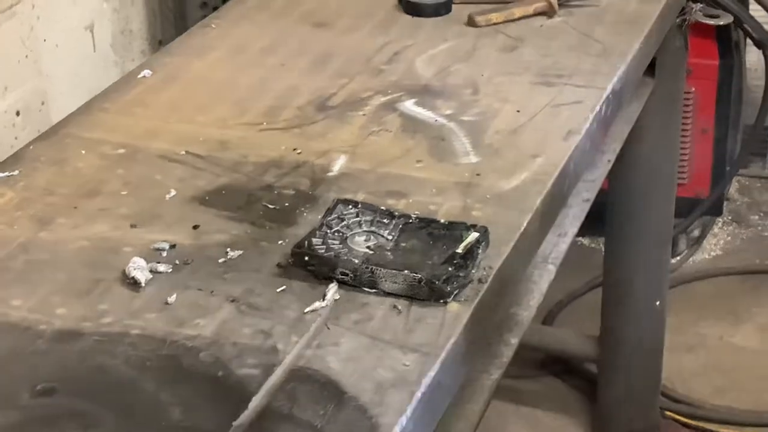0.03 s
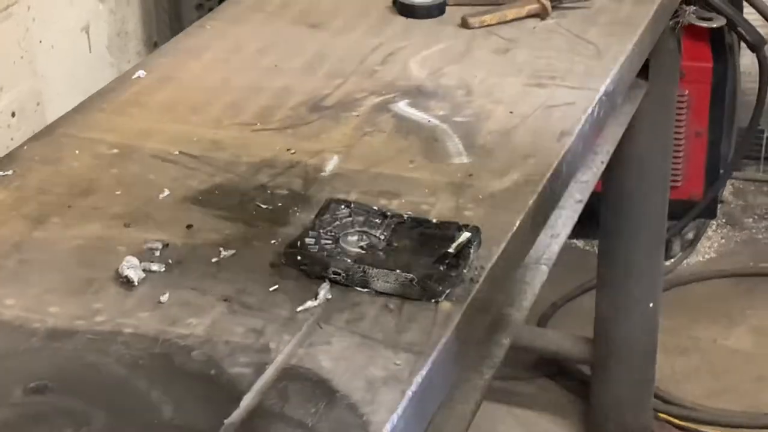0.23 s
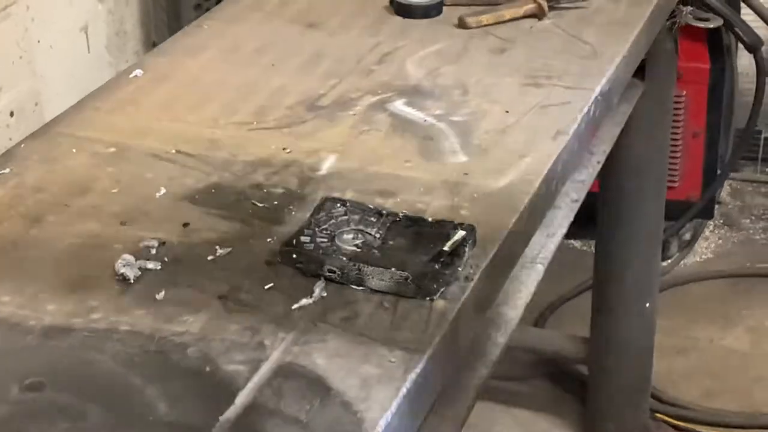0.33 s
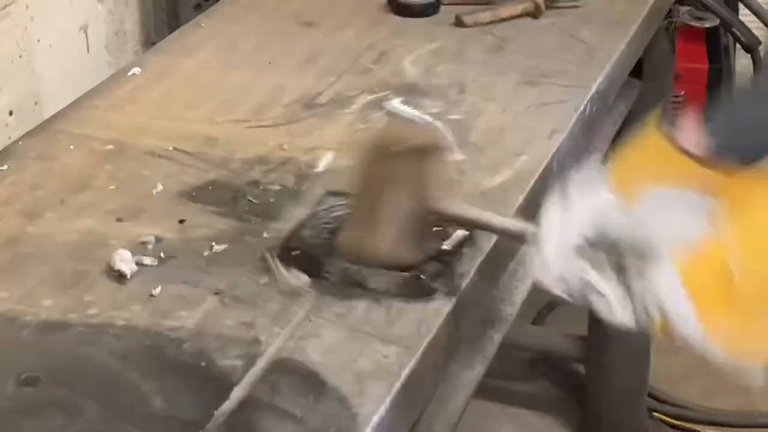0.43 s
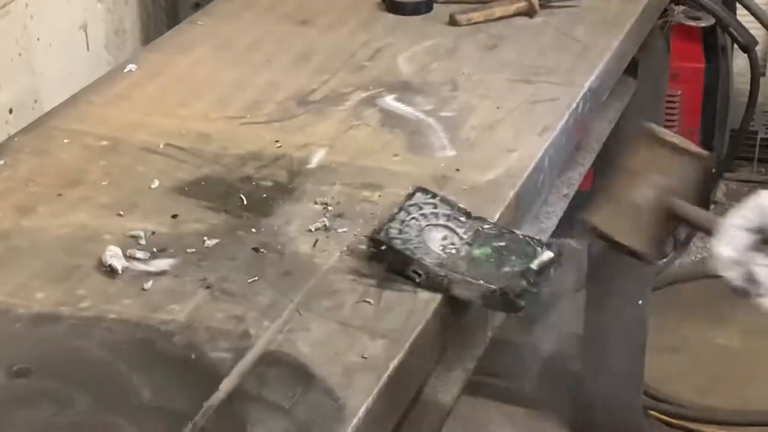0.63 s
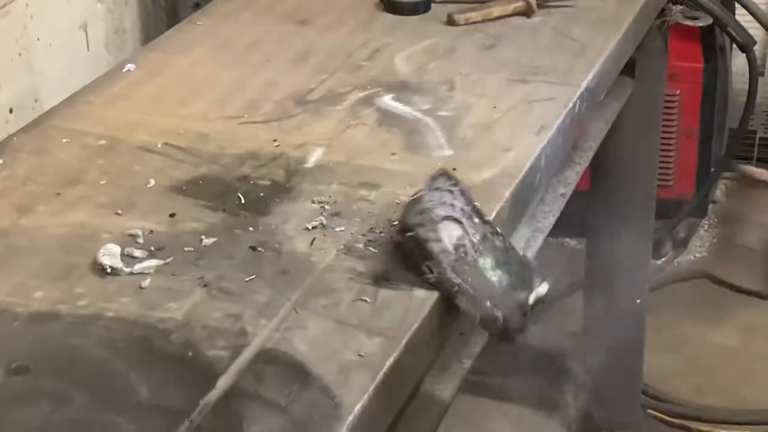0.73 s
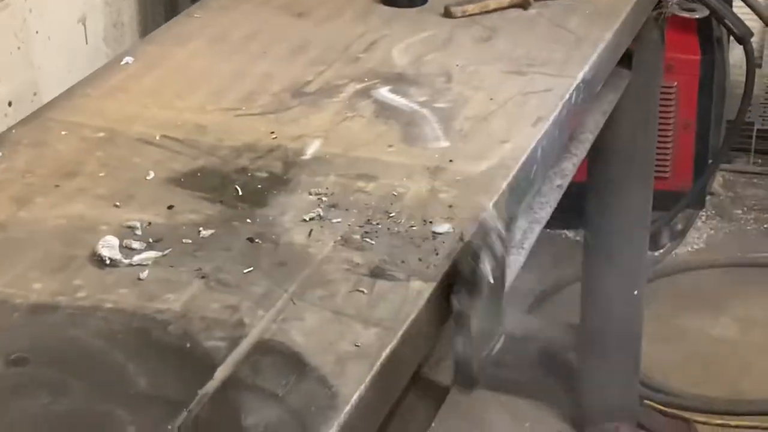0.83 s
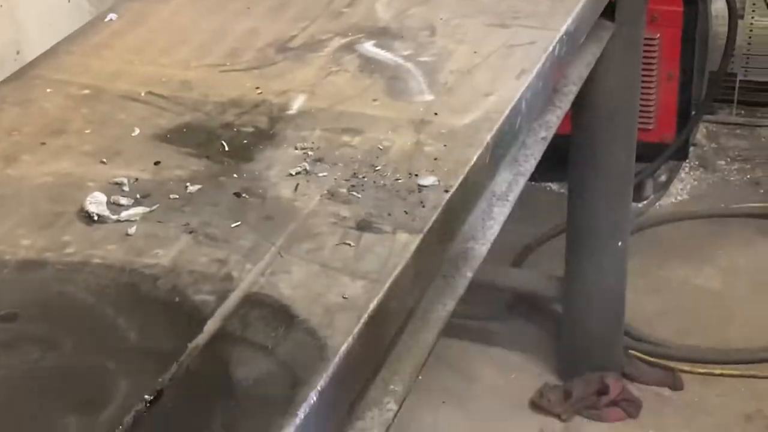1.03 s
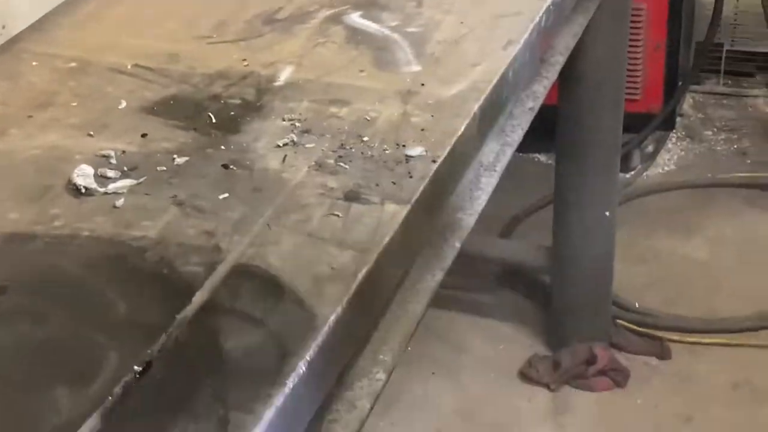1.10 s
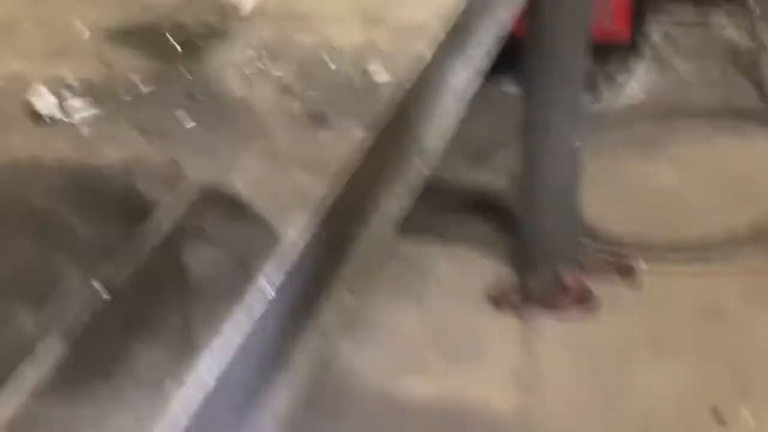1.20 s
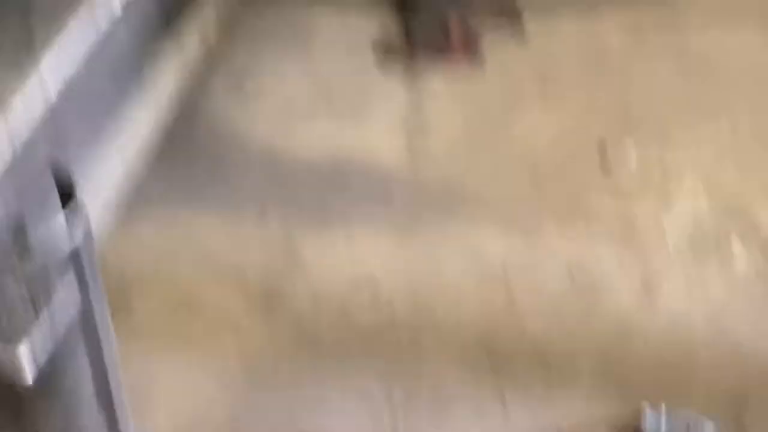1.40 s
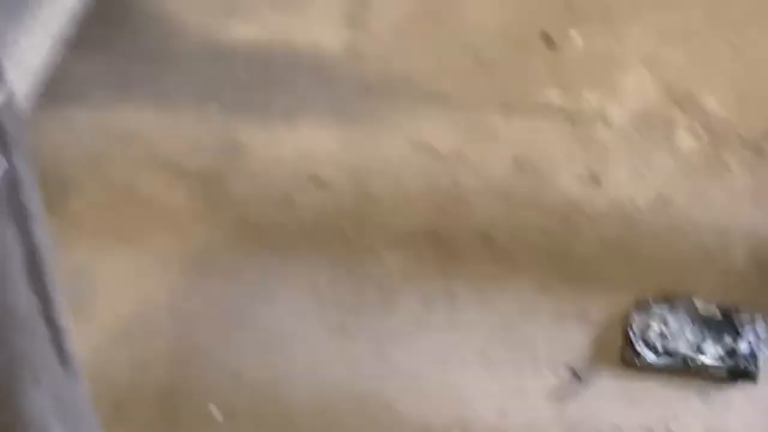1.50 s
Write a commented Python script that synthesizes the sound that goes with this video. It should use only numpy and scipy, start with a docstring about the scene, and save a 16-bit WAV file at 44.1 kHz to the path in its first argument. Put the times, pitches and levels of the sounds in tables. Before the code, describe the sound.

A hammer smashes a hard drive close by at about 0.5 seconds: a sharp crack, a booming, ringing steel workbench and rattling loose parts. The drive scrapes faintly off the edge around 0.75 seconds, knocks on the concrete floor farther away at 0.95, and clacks down again at 1.2, with small taps until 1.4. The workshop echoes, and a machine's quiet rush, low rumble and throbbing hum continue throughout.

```python
"""A hammer smashes a hard drive on a steel workbench: a short rasp swells, the case cracks,
the bench booms and rings, and loose parts rattle. The drive slides off, knocks on the
concrete floor, bounces and clacks down again. The workshop echoes each blow;
behind it all are a machine's rush, a low rumble and a throbbing hum."""
import sys
import numpy as np
from scipy import signal
from scipy.fft import rfft, irfft, next_fast_len
from scipy.io import wavfile
from scipy.ndimage import uniform_filter1d

SR = 44100
rng = np.random.default_rng(int(sys.argv[2]) if len(sys.argv) > 2 else 0)


def unload_wav(signal):
    """Save mono or channel-first audio to the path in sys.argv[1] as 16-bit WAV at rate SR, clipped to [-1, 1]."""
    wavfile.write(
        sys.argv[1],
        SR,
        np.round(np.clip(np.atleast_2d(signal).T, -1, 1) * 32767).astype(np.int16),
    )


N = 68355
T = np.arange(N) / SR


def amp(db):
    """Turn decibels into a gain."""
    return 10 ** (np.asarray(db) / 20)


def unit(x):
    """Scale to an average (rms) level of 1."""
    return x / np.sqrt(np.mean(x ** 2) + 1e-20)


def along(points, hz):
    """Read between a table's rows on a log frequency scale."""
    f, v = np.transpose(points)
    return np.interp(np.log(hz + 1), np.log(f + 1), v)


def filtered(x, response):
    """Turn each frequency up or down by its own gain."""
    m = next_fast_len(N + SR // 2)
    return irfft(rfft(x, m) * response(np.fft.rfftfreq(m, 1 / SR)), m)[..., :N]


def pan(db):
    """Two gains that make the left side db louder than the right."""
    return amp(np.array([[.5], [-.5]]) * db)


def fade(t, t60):
    """Die away by 60 dB in t60 seconds, the fade time."""
    return np.exp(-np.log(1000) * np.maximum(t, 0) / t60)


def strike(s, t60, attack_s=0.00065):
    """Rise quickly at time s, then fade."""
    t = np.maximum(T - s, 0)
    return (1 - np.exp(-t / attack_s)) * fade(t, t60)


def dying(x, s, decay):
    """From time s on, each frequency fades at its own speed."""
    hz, t, spectrum = signal.stft(x, SR, nperseg=256)
    return signal.istft(spectrum * fade(t - s, along(decay, hz)[:, None]), SR)[1][:, :N]


def grainy(depth_db):
    """A spiky gain that changes every millisecond or two."""
    jitter = unit(uniform_filter1d(rng.standard_normal(N), size=70))
    return unit(amp(depth_db * jitter))


# how far each frequency leans left: f/Hz, pan/dB
LEAN = [(60, -2), (280, 0.5), (600, 2), (1100, 2.5), (2200, 0.5), (5000, -1), (12000, 0.1)]
def noise(colour, alike):
    """Stereo noise: colour sets its tone, alike how well the sides match (1 = fully)."""
    def shape(hz):
        width = np.arccos(np.clip(along(alike, hz), -1, 1)) / 2
        return amp(along(colour, hz)) * [np.cos(width), np.sin(width)]
    mid, side = filtered(rng.standard_normal((2, N)), shape)
    stereo = np.array([mid + side, mid - side])
    return unit(filtered(stereo, lambda hz: pan(along(LEAN, hz))))


# how well left and right match in a hit: f/Hz, likeness
HIT_ALIKE = [(100, 1), (300, 0.98), (600, 0.65), (1200, 0.15), (4000, -0.13), (8000, -0.018),
             (13000, -0.076)]
def note(s, hz, t60, attack_s):
    """One note of struck metal; high notes are out of step between left and right."""
    spread = np.arccos(np.clip(along(HIT_ALIKE, hz), -1, 1)) * rng.choice([-1, 1])
    phase = 2 * np.pi * hz * (T - s) + np.array([[.5], [-.5]]) * spread
    return np.sin(phase) * strike(s, t60, attack_s)


# the background, which sinks after the blow: t/s, rush level/dB, rumble level/dB
BACKGROUND = [(0, -30, -40.5), (0.299, -30.5, -33), (.44, -30.5, -46.5), (.52, -46, -40),
              (.68, -40.5, -42.5), (.82, -37, -37.5), (0.921, -37, -42.5), (1.15, -39.5, -42.5),
              (1.55, -38.5, -43.5)]
# tone of the rush and of the rumble: f/Hz, level/dB
RUSH_COLOUR = [(60, -21), (120, -3.5), (230, -6), (330, -10), (520, -10.5), (800, -16), (1400, -22.5),
               (1900, -24), (3500, -28), (6500, -40.5), (12000, -41), (13500, -50.5), (15500, -46)]
RUMBLE_COLOUR = [(20, -20), (40, -10), (55, 6), (66, 9), (78, 10), (95, -20), (116, 8.5), (135, -41),
                 (250, -74.5)]
# how well left and right match in the rush: f/Hz, likeness
RUSH_ALIKE = [(150, 0.97), (400, 0.68), (1000, -0.15), (3000, -0.18), (9000, 0.6)]
def rush_and_rumble(swell_s=0.256, swell_width_s=0.022, swell_hz=67.4, swell_db=-27):
    """A machine rushes over a rumble; a low note swells once before the blow."""
    s, rush_db, rumble_db = np.transpose(BACKGROUND)
    rush = amp(np.interp(T, s, rush_db)) * noise(RUSH_COLOUR, RUSH_ALIKE)
    rumble = amp(np.interp(T, s, rumble_db)) * noise(RUMBLE_COLOUR, [(60, 0.95)])
    swell = amp(swell_db) * np.exp(-((T - swell_s) / swell_width_s) ** 2)
    return rush + rumble + swell * np.sin(2 * np.pi * swell_hz * T)


# loudness of the hum: t/s, level/dB
HUM_LEVEL = [(0, -33), (.4, -39), (.68, -41.5), (.73, -32), (.9, -29), (1.3, -31.5), (1.55, -32)]
def hum(hz=160.7, beat_hz=11.04, silent_at_s=1.14):
    """Two close tones drift in and out of step, so the hum throbs."""
    tone = np.sin(2 * np.pi * hz * T + rng.uniform(0, 2 * np.pi))
    throb = np.sqrt(2) * np.sin(np.pi * beat_hz * (T - silent_at_s))
    return amp(np.interp(T, *np.transpose(HUM_LEVEL))) * tone * throb


# how long the workshop echoes: f/Hz, fade time/s
ECHO_FADE = [(150, 0.49), (1000, 0.72), (3000, 0.55), (7000, 0.47), (14000, 0.27)]
# how well left and right match in the echo: f/Hz, likeness
ECHO_ALIKE = [(150, 1), (500, 0.48), (1200, 0.39), (4000, 0.16)]
def room(x, echo_db):
    """Add the workshop's echo, nearly the same on both sides in the bass."""
    hiss = noise([(50, -3), (300, -4)], ECHO_ALIKE)
    tail = dying(hiss, 0, ECHO_FADE) * (1 - np.exp(-T / 0.0023))
    tail /= np.linalg.norm(tail[0])
    return x + amp(echo_db) * signal.fftconvolve(x, tail, axes=1)[:, :N]


# skids over the bench edge, then the floor: t/s, half length/s, level/dB, treble tilt/(dB per octave)
SLIDES = [(0.759, 0.067, -39.5, -6), (1.275, 0.044, -41, 5.5)]
# tone of a skid before its tilt: f/Hz, level/dB
SLIDE_COLOUR = [(200, -15.5), (900, 1), (2200, 2), (5000, -7.5), (11500, -18.5), (15000, -34)]
# how well left and right match in skids and landings: f/Hz, likeness
FALL_ALIKE = [(300, 0.72), (1000, 0.66), (3000, 0.21), (10000, 0.053)]
def slides():
    """The drive skids with a gritty scrape, brighter on concrete than on steel."""
    out = np.zeros((2, N))
    for s, half_s, db, tilt_db in SLIDES:
        colour = [(hz, level + tilt_db * np.log2(hz)) for hz, level in SLIDE_COLOUR]
        swell = amp(db) * np.exp(-((T - s) / half_s) ** 2)
        out += swell * grainy(depth_db=2) * noise(colour, FALL_ALIKE)
    return out


# the drive hits the floor: t/s, knock/dB, clack/dB, crack/dB, ring/dB, ring tilt/(dB per octave)
LANDINGS = [(0.9492, -26.5, -40, -50, -33, -2), (1.2221, -50.5, -29, -12, -39, 2),
            (1.2285, -60, -35.5, -24, -46.5, 4.5), (1.283, -56, -52, -47, -71, 6),
            (1.372, -56, -60, -52, -56, 1)]
# tone of the knock and of the clack: f/Hz, level/dB
KNOCK_COLOUR = [(100, -52), (330, -11), (500, -12), (750, 1.5), (1200, 0.5), (1800, -1), (2200, -14.5),
                (4000, -21), (12000, -34)]
CLACK_COLOUR = [(200, -31), (550, -14), (800, 5), (1150, 2), (1550, -9), (2400, -2.5), (3000, -7.5),
                (3950, -1), (4600, -10), (5400, -8.5), (6300, -9), (8000, -12.5), (11500, -11.5),
                (15500, -22)]
# notes the drive's case rings at: f/Hz, level/dB, fade time/s
CASE_NOTES = [(335, -5.5, 0.41), (742, -8, 0.16), (801, 2, 0.21), (905, -1, 0.21), (972, -6, .15),
              (1117, -1, 0.18), (1264, -13, .4), (1630, 1, 0.19), (1755, -9, 0.2), (2290, -5, 0.23),
              (3305, -9.5, 0.19), (3620, -8, .18), (4002, -11, 0.14), (5100, -12, .14)]
def landings():
    """Each landing knocks, clacks with a sharp crack and rings the case with its own brightness."""
    out = np.zeros((2, N))
    for s, knock_db, clack_db, crack_db, ring_db, tilt_db in LANDINGS:
        out += amp(knock_db) * strike(s, t60=0.23) * noise(KNOCK_COLOUR, FALL_ALIKE)
        clack = amp(clack_db) * strike(s, t60=0.15)
        crack = amp(crack_db) * strike(s, t60=0.0064)
        out += (clack + crack) * noise(CLACK_COLOUR, FALL_ALIKE)
        for hz, db, t60 in CASE_NOTES:
            level_db = ring_db + db + tilt_db * np.log2(hz / 1000) + rng.normal(0, 1.2)
            out += amp(level_db) * pan(along(LEAN, hz)) * note(s, hz, t60, attack_s=0.00043)
    return out


# sharp metal contacts: t/s, level/dB, fade time/s, pan/dB
TICKS = [(0.4636, -8.5, 0.012, 0), (.9445, -39.5, 0.11, 2), (1.369, -43, 0.052, 0)]
# tone of a tick: f/Hz, level/dB
TICK_COLOUR = [(500, -29), (3000, -15), (7000, 2), (10500, 2), (14500, -4), (16500, -39)]
def ticks():
    """Hard metal edges make short, bright ticks as they hit."""
    return sum(amp(db) * pan(left_db) * strike(s, t60) * noise(TICK_COLOUR, HIT_ALIKE)
               for s, db, t60, left_db in TICKS)


# tone of the rattle: f/Hz, level/dB
RATTLE_COLOUR = [(130, -24), (280, -6), (460, -7), (650, -8.5), (900, -8.5), (1300, -10.5), (2200, -10),
                 (3300, -12.5), (5000, -20), (8000, -26.5), (12000, -28.5), (13200, -38), (15500, -61)]
# how long the rattle lasts: f/Hz, fade time/s
RATTLE_FADE = [(200, 0.21), (1000, 0.33), (3000, 0.23), (7000, 0.25), (14000, 0.15)]
def rattle(start_s=0.468, db=-10, rise_s=0.0055):
    """Loose parts shake after the blow and settle."""
    rise = 1 - np.exp(-np.maximum(T - start_s, 0) / rise_s)
    shaking = amp(db) * rise * grainy(depth_db=1.5)
    return shaking * dying(noise(RATTLE_COLOUR, HIT_ALIKE), start_s, RATTLE_FADE)


# notes of the bench and the drive on it: f/Hz, level/dB, fade time/s, pan/dB
BENCH_NOTES = [(108, -37, 0.2, -7), (157, -18, 0.2, 1.5), (278.7, -7, .11, -3.5),
               (286.7, -22.5, 0.58, -1.5), (362, -12.5, 0.13, 0), (475.4, -14, 0.23, -1),
               (708.2, -12, 0.13, 7), (930, -17.5, 0.18, 4), (1072.5, -27.5, 0.24, 12),
               (1228, -26, 0.24, 9), (1752, -24, 0.29, 13.5), (1826, -26.5, 0.27, -6),
               (2240, -35, 0.27, -11), (2320, -28, 0.12, 16), (2620, -45, 0.19, -1)]
def bench(blow_s=0.4662, attack_s=0.0011):
    """The whole bench gives under the blow with a deep boom, and its steel rings."""
    boom = amp(-19.5) * note(blow_s, hz=42, t60=0.071, attack_s=attack_s)
    ring = sum(amp(db) * pan(left_db) * note(blow_s, hz, t60, attack_s)
               for hz, db, t60, left_db in BENCH_NOTES)
    return boom + ring


# a short rasp, then the case cracking: t/s, level/dB, swell time/s, fade time/s, pan/dB
BURSTS = [(0.454, -19.5, 0.0041, 0.035, -5), (0.4628, -13, 0.0047, 0.023, -8)]
# the blow, then the drive slapping back on the bench: t/s, level/dB, fade time/s
THUDS = [(0.4667, -6.5, .035), (0.477, -8, 0.064), (0.499, -21, 0.015)]
# tone of the bursts and of the thuds: f/Hz, level/dB
BURST_COLOUR = [(100, -9), (400, 9), (1300, -15), (2300, 1), (3100, -2.5), (4000, -11.5), (7000, -11),
                (9000, -31), (15000, -52)]
THUD_COLOUR = [(30, -28), (130, -25), (240, 0.5), (420, 8), (750, -8), (1300, -4), (2500, -10), (6000, -48)]
def hammer():
    """A short rasp swells, then the case cracks and the blow thuds through to the bench."""
    out = np.zeros((2, N))
    for s, db, swell_s, t60, left_db in BURSTS:
        burst = np.exp(np.minimum(T - s, 0) / swell_s) * fade(T - s, t60)
        out += amp(db) * pan(left_db) * burst * noise(BURST_COLOUR, HIT_ALIKE)
    for s, db, t60 in THUDS:
        out += amp(db) * strike(s, t60) * noise(THUD_COLOUR, HIT_ALIKE)
    return out


def scene():
    """The blow close by, the landings farther off, the workshop behind."""
    near = room(hammer() + bench() + rattle() + ticks() + slides(), echo_db=-12.5)
    far = room(landings(), echo_db=-6.5)
    return near + far + rush_and_rumble() + hum()


def record(dry):
    """Round off the loudest peaks and cut the very highest treble."""
    rounded = dry / (1 + np.abs(dry / .9) ** 6) ** (1 / 6)
    return filtered(rounded, lambda hz: hz < 15900)


dry = scene()
out = record(dry)
unload_wav(out)
```